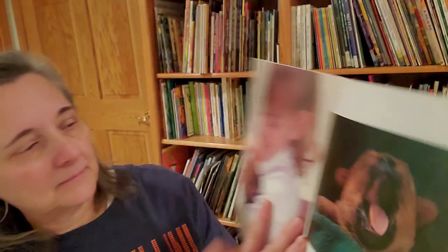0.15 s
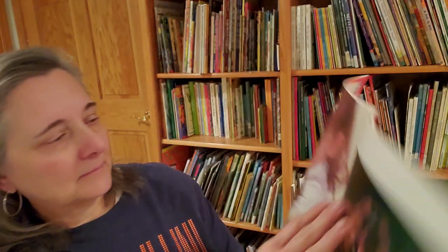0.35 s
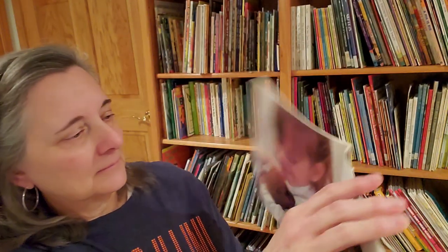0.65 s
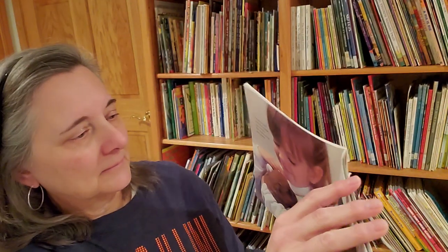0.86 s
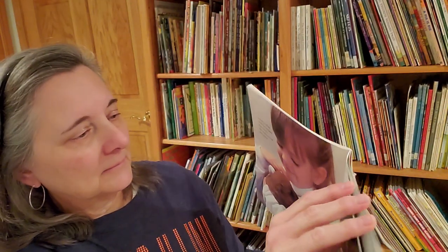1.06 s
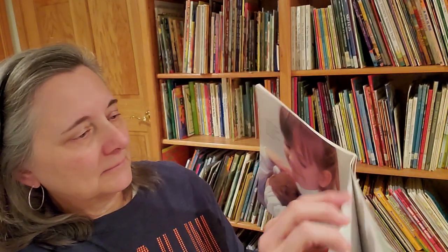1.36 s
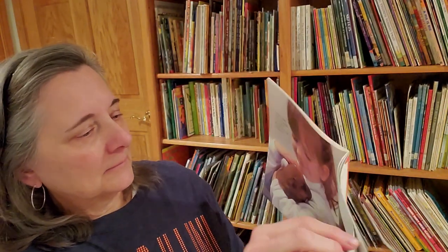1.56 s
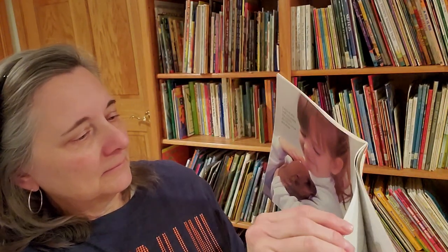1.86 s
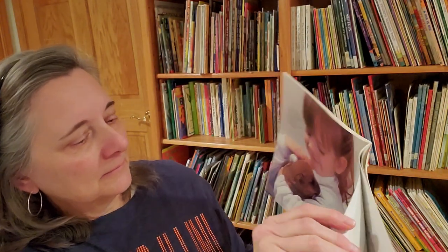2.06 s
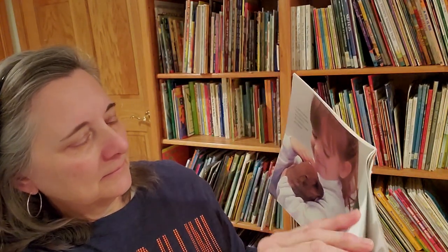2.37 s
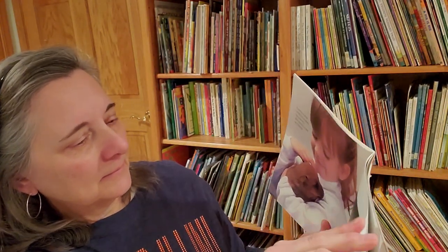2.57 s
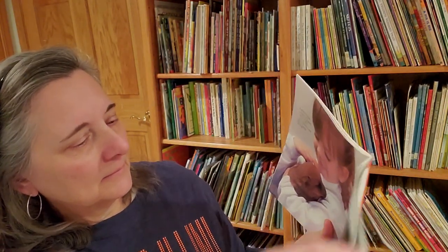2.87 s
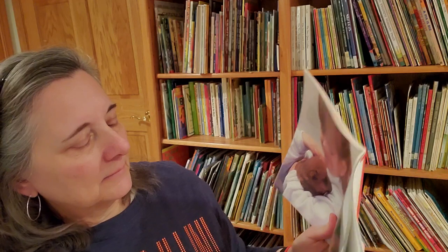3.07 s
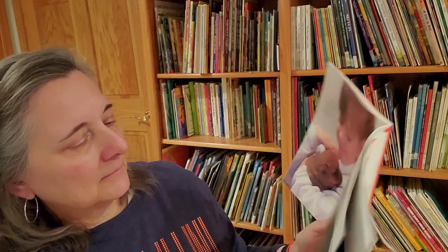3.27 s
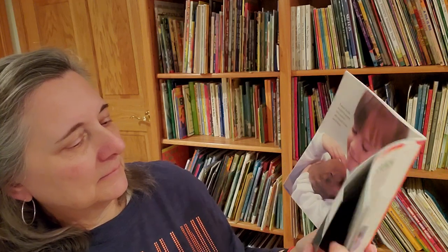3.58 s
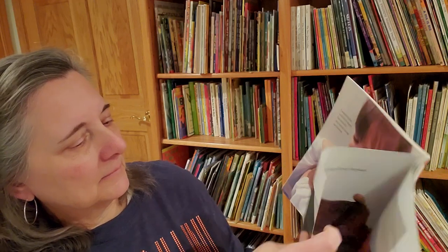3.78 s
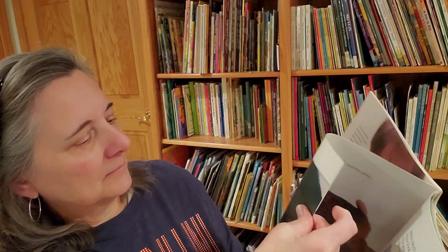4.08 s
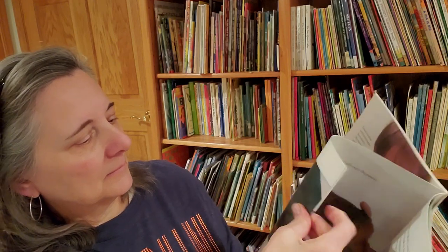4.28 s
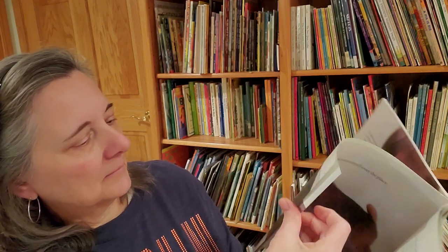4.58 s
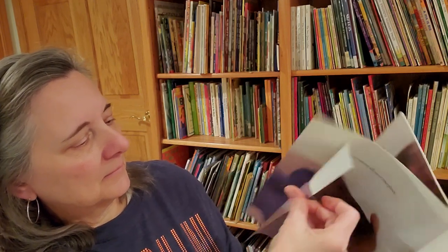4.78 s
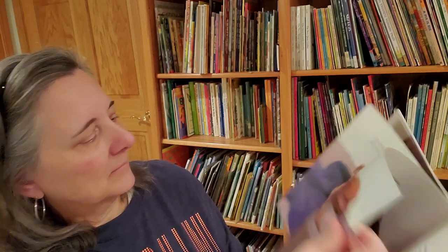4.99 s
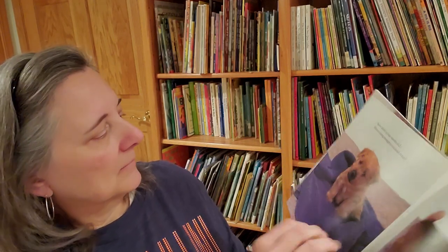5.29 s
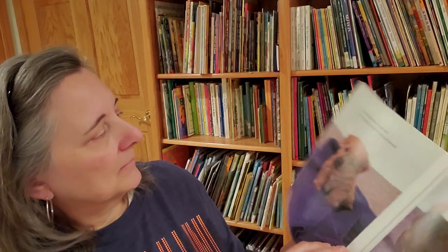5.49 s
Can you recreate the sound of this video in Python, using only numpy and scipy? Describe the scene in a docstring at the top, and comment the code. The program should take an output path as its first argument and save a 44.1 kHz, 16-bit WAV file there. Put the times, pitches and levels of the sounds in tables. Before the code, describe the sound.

A glossy picture book is handled close to a stereo microphone in a small quiet room. A brief rustle fades to near silence, then dry rubbing and a run of light crackles follow, a sharper flick near three seconds, and loud page snaps in the last part. Faint hum and hiss stay underneath.

```python
"""A glossy picture book is leafed through by hand, close by in a small quiet room.
Fingers rub and bend the coated pages: dense random grains ring the sheet, its edge and its coating.
Page corners flick and sheets snap: a blunt pulse and a dying rattle ring the same paper.
Filtered noise gives a low room hum and a faint steady hiss; feedback delays give a short tail.
Two microphone ports hear the book from the left, so its sound comes to the right one later."""
import sys
import numpy as np
from scipy import signal
from scipy.fft import rfft, irfft, next_fast_len
from scipy.io import wavfile

SR = 44100
rng = np.random.default_rng(int(sys.argv[2]) if len(sys.argv) > 2 else 0)


def waveform_to_disk(signal):
    """Save audio, clipped to [-1, 1], as 16-bit WAV at the path in sys.argv[1]."""
    frames = np.transpose(np.atleast_2d(signal))
    scaled = np.clip(frames, -1, 1) * 32767
    samples = np.round(scaled).astype(np.int16)
    wavfile.write(sys.argv[1], SR, samples)


N = 248283   # length in samples

# Resonances of the bowed sheet. Each row: pitch in Hz, width in Hz, relative level in dB.
SHEET_MODES = [(480, 170, -2.5), (800, 187, -1.5), (1076, 250, -5), (1918, 307, 0)]
# Resonances of the page edge, rubbed or cracking. Each row: pitch in Hz, width in Hz, relative level in dB.
EDGE_MODES = [(1880, 1140, 1.5), (2656, 1356, 4), (3497, 1390, 0.5), (5090, 1380, -5), (6710, 1050, -3)]


def from_db(db):
    """Gain of a level in dB."""
    return 10 ** (np.asarray(db) / 20)


def rms_one(x):
    """Scaled to rms 1."""
    return x / np.sqrt(np.mean(x ** 2) + 1e-20)


def at_hz(points, hz):
    """Value of a (Hz, value) table on a log-frequency axis."""
    table_hz, values = np.array(points).T
    return np.interp(np.log(hz), np.log(table_hz), values)


def drift(rate):
    """Slow random wavering of spread 1, changing about rate times a second."""
    step = 20   # samples between the slow values
    r = np.exp(-2 * np.pi * rate * step / SR)
    white = rng.standard_normal(N // step + 2002)
    slow = signal.lfilter([1], [1, -2 * r, r * r], white)[2000:]
    return np.interp(np.arange(N) / step, np.arange(len(slow)), rms_one(slow))


def butter(x, order, hz, kind):
    """Butterworth filter: low, high or band."""
    return signal.sosfilt(signal.butter(order, hz, kind, fs=SR, output="sos"), x)


def resonance(hz, width):
    """Coefficients of a two-pole band-pass with gain 1 on top."""
    r = np.exp(-np.pi * width / SR)
    return (1 - r * r) / 2 * np.array([1, 0, -1]), [1, -2 * r * np.cos(2 * np.pi * hz / SR), r * r]


def body(x, modes, low_hz):
    """Resonances in parallel, cut steeply below low_hz; white noise keeps its rms."""
    probed = np.concatenate([np.eye(1, x.shape[1]), x]) + 1e-18   # the first row is a test impulse
    out = 0
    for k, (hz, width, db) in enumerate(modes):
        out = out + (-1) ** k * from_db(db) * signal.lfilter(*resonance(hz, width), probed)
    out = butter(out, 3, low_hz, "high")
    return out[1:] / np.sqrt(np.sum(out[0] ** 2))


def gliding(x, hz, width, share):
    """A resonance that follows hz, block by block, plus a broad share of the input."""
    out, state = np.zeros_like(x), np.zeros((len(x), 2))
    for i in range(0, N, 256):
        block = x[:, i:i + 256]
        out[:, i:i + 256], state = signal.lfilter(*resonance(hz[i], width), block, zi=state)
    return out + share * x


def grains(per_s, spread_db, apart):
    """Stick-slip clicks of uneven size; each port also hears a share of its own."""
    size = from_db(spread_db * np.minimum(rng.exponential(1, (3, N)), 4))
    size = size * rng.choice([-1, 1], (3, N))
    both, left, right = rms_one(size * (rng.random((3, N)) < per_s / SR))
    return rms_one(both + apart * np.array([left, right]))


def air():
    """Faint steady hiss: high-passed noise, independent at the two ports."""
    return from_db(-83.5) * butter(rng.standard_normal((2, N)), 2, 2000, "high")


def hum(patchy_db):
    """Third-octave bands of low noise, each wavering a little, with a set likeness between the ports."""
    # Spectrum of the room hum. Each row: frequency in Hz, relative density in dB per Hz.
    hum_spectrum = [(12, -40), (20, -18.5), (54, -1), (81, 3.5), (129, -9.5), (173, -8), (266, -17),
                    (387, -27.5), (565, -33), (637, -39.5), (756, -36), (1010, -41), (1200, -36),
                    (1560, -66), (2640, -120)]
    # How alike the ports hear the room. Each row: frequency in Hz, left-right correlation.
    port_likeness = [(60, 0.98), (180, 0.96), (550, 0.56), (1650, -0.15), (4970, 0.04), (15000, 0.08)]
    level_db = -55
    out, edges = 0, 18 * 2 ** np.arange(0, 5.7, 1 / 3)
    white = rng.standard_normal((2, 2, N + SR))
    for k, (low, high) in enumerate(zip(edges, edges[1:])):
        # neighbouring bands draw on separate noises; the first second settles the filter
        mid, side = butter(white[k % 2], 2, [low, high], "band")[:, SR:]
        centre_hz = np.sqrt(low * high)
        alike = np.clip(at_hz(port_likeness, centre_hz), -1, 1)
        gain = from_db(at_hz(hum_spectrum, centre_hz) + patchy_db * drift(5.1))
        out = out + gain * (np.sqrt(1 + alike) * mid + np.sqrt(1 - alike) * side * [[1], [-1]])
    return from_db(level_db + np.array([[-.4], [.4]])) * rms_one(out)


def room(x):
    """Short tail: six feedback delays a side, duller on every round."""
    t60_s, wall_cut_hz = 0.14, 17000
    size = next_fast_len(N + SR)
    turn = np.exp(-2j * np.pi * np.arange(size // 2 + 1) / size)   # a delay of one sample
    dull = np.exp(-2 * np.pi * wall_cut_hz / SR)
    echo = np.zeros((2, len(turn)), complex)
    for k, lag in enumerate((rng.uniform(.006, 0.03, 12) * SR).astype(int)):
        loss = from_db(-60 * lag / SR / t60_s)
        loop = loss * (1 - dull) / (1 - dull * turn) * turn ** lag
        echo[k % 2] += (-1) ** (k // 2) * loop / (1 - loop)
    return irfft(echo * rfft(x.mean(axis=0), size), size)[:, :N]


def handling():
    """Finger strokes add up in power; each pitch is their power-weighted mean."""
    # Slides and bends of a page. Each row: start of full pressure in seconds, attack, hold and release
    # in seconds, relative rubbing level in dB, rubbing resonance in Hz, relative flexing level in dB,
    # sheet pitch in Hz, relative surface hiss in dB.
    page_strokes = [(0.0, 0.02, 0.054, 0.3, -60, 5600, -70, 750, -58.5),
                    (0.166, 0.059, 0.041, 0.19, -64.5, 5270, -64.5, 1030, -80),
                    (0.37, 1, 0.12, 0.31, -64, 5180, -88, 880, -57.5),
                    (0.764, 0.22, .005, 0.27, -73.5, 6540, -87, 760, -72),
                    (0.86, .05, 0.077, .3, -76, 4100, -84, 730, -78),
                    (1.056, 0.23, .005, .1, -70, 4300, -77.5, 1160, -80),
                    (1.112, 0.081, .005, 0.15, -66, 5100, -79, 770, -68),
                    (1.263, 0.2, .005, .3, -73.5, 3630, -82.5, 1270, -86),
                    (1.345, 0.09, 0.028, .1, -66, 3800, -73, 1630, -70),
                    (1.434, 0.11, 0.027, 0.36, -52.5, 3040, -73, 830, -52),
                    (1.51, 0.16, 0.025, .13, -47.5, 4130, -66.5, 860, -52.5),
                    (1.716, .075, 0.038, 0.089, -54.5, 3500, -67.5, 1290, -64),
                    (1.804, 0.033, 0.49, .05, -74, 3400, -78.5, 1110, -74.5),
                    (2.052, 0.024, .003, 0.036, -48, 3900, -55, 930, -54),
                    (2.24, 0.13, 0.024, 0.17, -59, 4160, -78, 1090, -62.5),
                    (2.298, .05, 0.14, 0.23, -58.5, 3330, -69, 1050, -68.5),
                    (2.503, 0.042, .003, .07, -58, 3240, -67, 1090, -68),
                    (2.553, 0.04, 0.016, 0.17, -56.5, 3200, -67, 1070, -61.5),
                    (2.682, 0.073, 0.042, .1, -65, 2850, -80, 1070, -81),
                    (2.754, 0.037, .003, 0.31, -56, 3070, -67, 1010, -71),
                    (2.827, 0.063, 0.096, 0.087, -56, 4000, -85, 970, -61),
                    (2.954, 0.083, 0.11, .1, -61, 4030, -76.5, 950, -67.5),
                    (3.116, 0.064, 0.0034, 0.058, -49.5, 4200, -63, 900, -52),
                    (3.152, 0.038, .003, 0.23, -53.5, 2940, -61.5, 1010, -59),
                    (3.261, 0.16, 0.024, 0.12, -69.5, 3120, -75, 740, -69.5),
                    (3.342, 0.14, 0.079, 0.45, -73, 5100, -74.5, 910, -81),
                    (3.563, 0.044, .003, 0.22, -63, 2600, -59, 1090, -71),
                    (3.704, 0.02, 0.026, 0.19, -74.5, 2650, -67.5, 1100, -76.5),
                    (3.949, 0.16, .003, 0.061, -73, 2600, -64.5, 1090, -92),
                    (3.991, 0.017, 0.028, 0.22, -75, 3830, -66, 1090, -75.5),
                    (4.13, 0.018, 0.025, 0.12, -69, 3830, -60, 770, -68),
                    (4.303, 0.085, 0.043, .05, -70.5, 5430, -71, 1150, -78.5),
                    (4.365, 0.038, 0.0033, 0.036, -48.5, 3030, -33.5, 1150, -58),
                    (4.417, 0.089, .005, 0.13, -48.5, 3900, -52, 990, -52.5),
                    (4.515, 0.041, 0.0097, 0.11, -48.5, 3020, -43, 980, -58.5),
                    (4.718, 0.059, 0.0034, 0.052, -58.5, 3620, -62.5, 970, -59),
                    (4.802, 0.061, 0.0036, 0.069, -77, 3400, -61.5, 920, -85),
                    (4.842, 0.13, .003, 0.099, -74, 3600, -87, 953, -75),
                    (4.966, 0.025, 0.055, 0.18, -58, 4200, -58, 970, -68.5),
                    (5.073, 0.021, 0.012, 0.065, -56, 2720, -39.5, 980, -85),
                    (5.144, 0.094, 0.024, 0.04, -53, 3350, -53, 930, -50.5),
                    (5.195, 0.029, 0.0036, 0.082, -33, 2700, -36.5, 1150, -70),
                    (5.246, 0.073, 0.026, 0.048, -76, 2890, -43, 1230, -71.5),
                    (5.268, 0.022, 0.0073, 0.064, -45, 3000, -45, 1190, -59),
                    (5.465, 0.038, .003, 0.079, -37.5, 2640, -33.5, 1270, -54),
                    (5.516, 0.026, 0.0028, 0.039, -59, 2880, -44.5, 1330, -59),
                    (5.542, 0.06, .003, 0.27, -54.5, 4730, -65, 1280, -61.5)]
    swing_db, release_bend = 34.5, 0.79   # level change over an attack or release; the release slows
    t = np.arange(0, N, 64) / SR
    columns = np.transpose(page_strokes)[:, :, None]
    s, attack, hold, release, rub_db, rub_hz, flex_db, flex_hz, hiss_db = columns
    before = np.maximum(s - t, 0) / attack
    after = np.maximum(t - s - hold, 0) / release
    pressure = from_db(-2 * swing_db * (before + after ** release_bend)) + 1e-30   # as power
    flex, rub, hiss = [pressure * from_db(2 * db) for db in (flex_db, rub_db, hiss_db)]
    rows = [10 * np.log10(flex.sum(axis=0)),
            (flex * flex_hz).sum(axis=0) / flex.sum(axis=0),
            10 * np.log10(rub.sum(axis=0)),
            (rub * rub_hz).sum(axis=0) / rub.sum(axis=0),
            10 * np.log10(hiss.sum(axis=0))]
    return [np.interp(np.arange(N) / SR, t, row) for row in rows]


def strokes():
    """Stick-slip grains under the finger flex the sheet, rub its edge and hiss on the coating."""
    # Resonances of the coating. Each row: pitch in Hz, width in Hz, relative level in dB.
    coating_modes = [(9180, 17000, -4.5), (11200, 1500, 1.5), (14700, 7700, -9.5)]
    flex_db, flex_hz, rub_db, rub_hz, hiss_db = handling()
    uneven = drift(41)   # the finger catches and slips
    flex = from_db(flex_db + 2.5 * uneven) * grains(3000, spread_db=2.5, apart=1.0)
    flex = from_db(1.5) * gliding(flex, flex_hz, width=307, share=0.16)
    flex = from_db(8) * body(flex, SHEET_MODES, 640)
    rub = from_db(rub_db + 1.75 * uneven) * grains(9000, spread_db=-1.5, apart=0.94)
    wavering_hz = rub_hz * (1 + 0.13 * drift(8.6))
    rub = from_db(7) * gliding(body(rub, EDGE_MODES, 1200), wavering_hz, width=1710, share=0.094)
    hiss = from_db(hiss_db + 0.24 * uneven) * grains(21000, spread_db=3.5, apart=6.2)
    return flex, rub, body(hiss, coating_modes, 5000)


def snaps():
    """A page lets go: a blunt pulse and a dying rattle ring its edge, the sheet and the stack of pages."""
    # Flicks and snaps. Each row: start in seconds, rise in ms, relative crack level in dB, crack pitch
    # in Hz, relative sheet level in dB, sheet pitch in Hz, relative knock of the page block in dB,
    # relative treble level in dB, dying time (t60) in seconds, left over right in dB.
    page_snaps = [(0.1367, 1.62, -42, 2470, -35.5, 930, -35.5, -84, 0.046, 3),
                  (0.5664, 2.3, -56.5, 4370, -62.5, 726, -87, -76, 0.2, -2),
                  (0.687, 1.2, -62, 6500, -83, 550, -80, -74, .04, -12),
                  (0.6981, 1.1, -65, 5740, -82, 550, -64, -77, 0.048, -15),
                  (0.7166, 1.3, -58, 5970, -90, 550, -78, -70, 0.034, -11),
                  (0.744, 1.3, -68, 5490, -87, 750, -68, -68.5, 0.035, -13),
                  (0.953, 1.2, -49, 4500, -77, 800, -82, -77, .04, -1),
                  (0.981, 1.2, -50, 5000, -78, 800, -78, -81, 0.036, -2),
                  (1.0033, 1.2, -45.5, 5040, -71, 1440, -74, -78, .045, -1),
                  (1.0265, 1.03, -47, 4120, -60.5, 720, -77, -76, .051, 1.5),
                  (1.043, 1.4, -46.5, 4830, -55.5, 1350, -83, -72, 0.051, -6),
                  (1.1169, 1.26, -44.5, 5530, -83, 665, -83, -56, 0.017, 0.1),
                  (1.5369, 1.2, -30, 4350, -69, 1370, -60, -68, .14, 1),
                  (1.7949, 2.56, -32.5, 4100, -51.5, 920, -74, -69, 0.047, 4.5),
                  (1.8311, 2.6, -30.5, 3940, -46, 890, -69, -67, 0.042, 5),
                  (1.8635, 2.9, -32.5, 3500, -45, 895, -54, -67, 0.082, 4.5),
                  (1.8938, 2.4, -34, 3280, -45, 534, -53, -64, .058, 5),
                  (1.9254, 1.58, -29.5, 3020, -37.5, 910, -47, -60.5, 0.059, 2),
                  (2.0065, 1.28, -32.5, 3200, -39.5, 850, -45, -64, 0.073, 3.5),
                  (2.0603, 0.92, -27.5, 3970, -34.5, 845, -46, -56.5, 0.047, 2.5),
                  (2.0995, 0.99, -31.5, 3750, -39, 860, -48, -59, 0.056, 1),
                  (2.137, 0.78, -29, 3200, -35, 960, -52, -58, 0.034, 3),
                  (2.17, .8, -30.5, 3300, -41.5, 860, -57, -59.5, 0.053, 3.5),
                  (2.2982, 1.5, -39, 3100, -77, 1580, -61, -66, 0.094, 5),
                  (2.373, 0.81, -32.5, 3000, -41.5, 860, -53.5, -68, 0.033, 8),
                  (2.5495, 1.8, -35, 3280, -69, 1100, -50, -60, 0.035, 7),
                  (2.587, 0.67, -33, 3060, -42.5, 1130, -54, -67, 0.035, 5),
                  (2.7432, .9, -25, 2780, -40, 1580, -64, -66.5, 0.036, 1),
                  (2.9786, 1.2, -56, 3750, -58, 684, -51, -57, 0.027, 1.1),
                  (3.119, 2.13, -16, 2900, -35, 1090, -38.5, -76, 0.048, 2.5),
                  (3.1317, 1.8, -43, 2890, -39.5, 1670, -43.5, -78, 0.09, 6),
                  (3.5513, 3.3, -34.5, 3380, -38.5, 795, -61, -65, 0.075, -4),
                  (3.59, 2.2, -53, 2160, -48.5, 1120, -57, -84, 0.1, -5),
                  (3.962, 1.5, -38.5, 5400, -40.5, 904, -55.5, -64, 0.087, -3),
                  (4.116, 1.29, -38, 2950, -35.5, 886, -51, -59.5, 0.065, -1),
                  (4.3384, 0.75, -10.5, 5400, -17, 1360, -44.5, -42.5, 0.042, 1),
                  (4.36, 1.1, -21.5, 2000, -32.5, 660, -44.5, -59, 0.17, 1),
                  (4.4953, 1.65, -19.5, 3100, -27, 1110, -50, -53.5, 0.037, 2),
                  (4.508, 1.7, -51, 2070, -31, 1126, -42, -79, 0.12, -6.5),
                  (4.6581, 1.41, -39, 5230, -42.5, 840, -65, -68.5, .065, 2),
                  (4.803, 1.2, -37, 6860, -77, 730, -77, -63, 0.046, -1.5),
                  (4.953, 2, -41.5, 5140, -57, 1030, -72, -74.5, 0.079, 8),
                  (5.1031, 2.3, -34, 2620, -34, 1230, -44, -62.5, 0.098, 2),
                  (5.1978, 1.2, -57, 3130, -34.5, 1070, -47, -77, 0.34, -1.5),
                  (5.305, 1.05, -60, 2570, -50, 1220, -51, -74, 0.036, -6),
                  (5.4243, 2.2, -33.5, 4180, -34.5, 1154, -48.5, -64, 0.54, 1.5),
                  (5.6062, 0.77, -34.5, 3685, -49, 1640, -82, -57.5, 0.047, -2.5)]
    # Resonances of the stack of pages. Each row: pitch in Hz, width in Hz, relative level in dB.
    block_modes = [(198, 180, 0), (317, 104, 4)]
    # Treble of a snap. Each row: pitch in Hz, width in Hz, relative level in dB.
    treble_modes = [(8650, 10000, -2.5), (12500, 7700, -1.5)]
    crack, knock, bow, slap, top = np.zeros((5, 2, N))
    rattle = grains(6000, spread_db=6.0, apart=1.0)
    t = np.arange(SR // 3) / SR
    for at_s, rise_ms, crack_db, crack_hz, sheet_db, sheet_hz, knock_db, treble_db, t60, pan_db in page_snaps:
        i = round(at_s * SR)
        n = min(len(t), N - i)
        span = slice(i, i + n)
        burst = rattle[:, span] * from_db(-60 * t[:n] / t60)   # the freed sheet rattles and dies
        burst = burst * (1 - np.exp(-1000 * t[:n] / rise_ms))
        burst = burst * (1 + from_db(-1.5) * np.exp(-550 * t[:n] / rise_ms))   # extra force early on
        j = int(rise_ms / 1000 * SR)
        # the release itself, a blunt pulse, weaker after a slow rise
        burst[:, j:j + 3] -= from_db(9.5) / rise_ms * np.array([.6, 1, .6])
        burst = burst * from_db([[pan_db / 2], [-pan_db / 2]])
        ring = signal.lfilter(*resonance(crack_hz, 1250), burst)
        crack[:, span] += from_db(crack_db - 14.5) * (.5 * burst + 2.0 * ring)
        slap[:, span] += from_db(sheet_db - 12.5) * burst
        # the curve of the sheet sets its pitch
        bow[:, span] += from_db(sheet_db + 14) * signal.lfilter(*resonance(sheet_hz, 170), burst)
        knock[:, span] += from_db(knock_db - 4) * burst.mean(axis=0)
        top[:, span] += from_db(treble_db + 4.5) * burst
    low = body(slap, SHEET_MODES, 220) + bow + body(knock, block_modes, 95)
    return low, body(crack, EDGE_MODES, 1940), body(top, treble_modes, 5700)


def paper():
    """Strokes and snaps joined into the low sheet sound and the bright edge sound."""
    flex, rub, hiss = strokes()
    snap_low, crack, top = snaps()
    low = flex + snap_low
    low = .35 * low.mean(axis=0) + .65 * low   # long waves reach both ports nearly alike
    edge = butter(rub + crack, 4, 7800, "low")   # rub and crack fall away steeply above 7.8 kHz
    treble = from_db([[1.8], [-1.8]]) * (hiss + top)   # stronger on the left
    return low, edge + treble


def scene():
    """The book reaches the right port a little later; the room adds a short tail."""
    # Delay to the right port, in seconds: the sheet, then the edge.
    right_lag_s = .00016, .000227
    parts = paper()
    direct = 0
    for (left, right), lag_s in zip(parts, right_lag_s):
        late = np.pad(right, (round(lag_s * SR), 0))[:N]
        direct = direct + np.array([left, late])
    return direct + from_db(-12.5) * room(sum(parts)) + hum(patchy_db=2.5) + air()


def record(dry):
    """The top is cut steeply, 60 dB down from 16300 Hz."""
    return signal.sosfilt(signal.cheby2(14, 60, 16300, fs=SR, output="sos"), dry)


dry = scene()
out = record(dry)
waveform_to_disk(out)
```